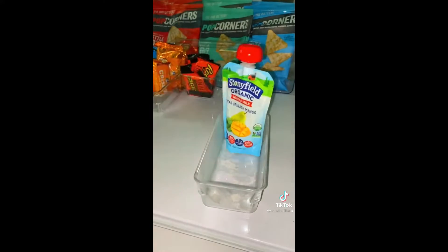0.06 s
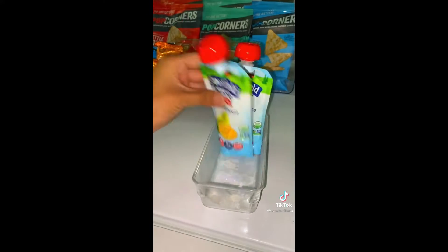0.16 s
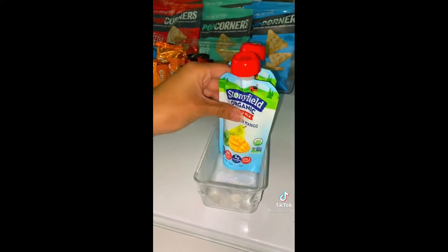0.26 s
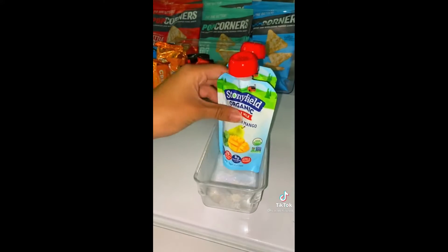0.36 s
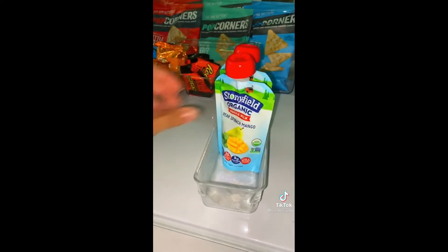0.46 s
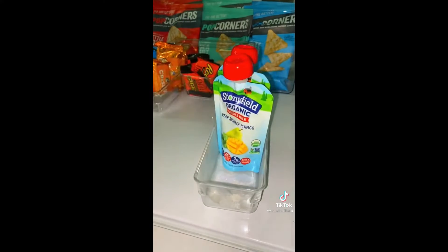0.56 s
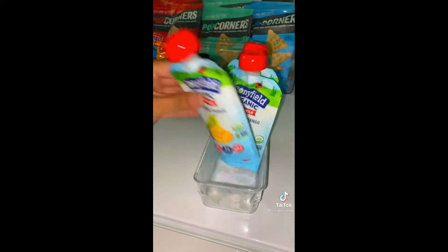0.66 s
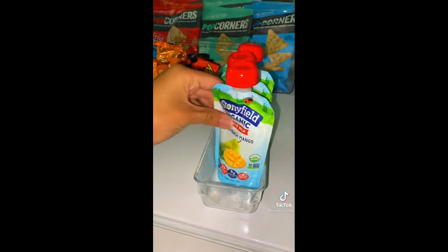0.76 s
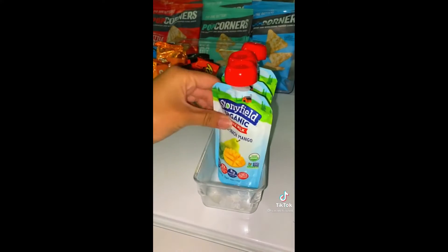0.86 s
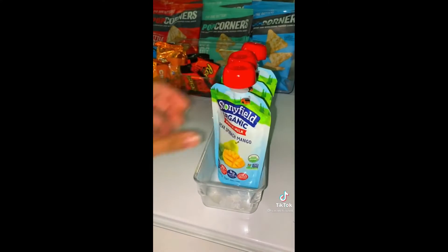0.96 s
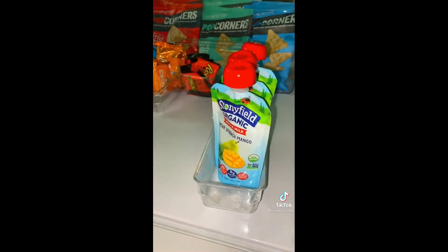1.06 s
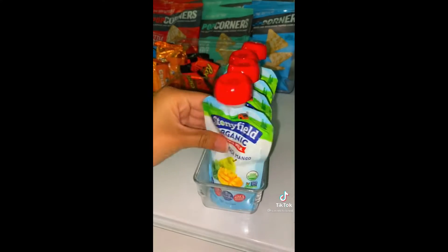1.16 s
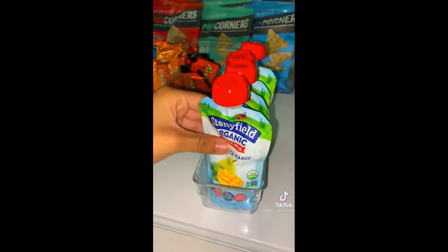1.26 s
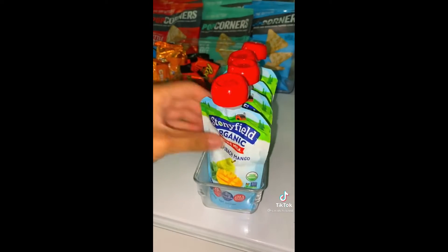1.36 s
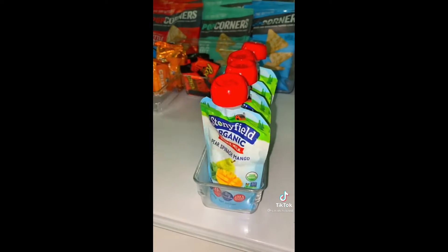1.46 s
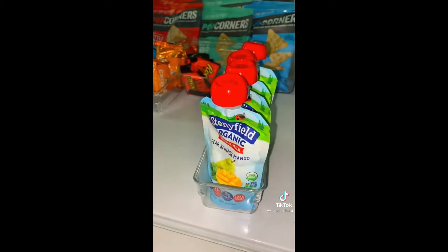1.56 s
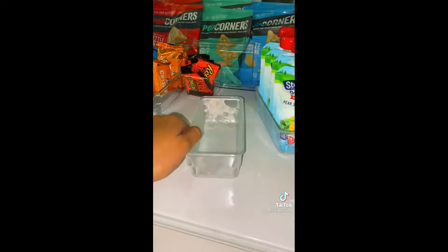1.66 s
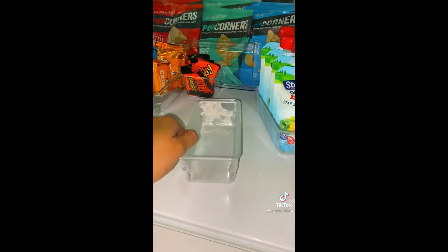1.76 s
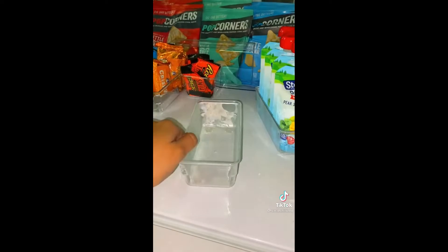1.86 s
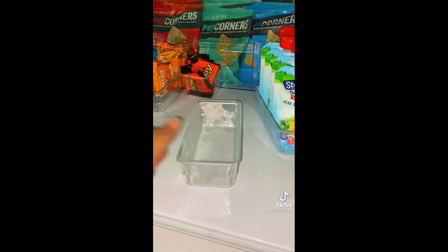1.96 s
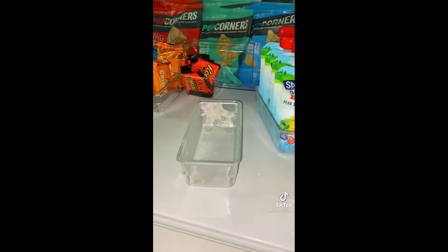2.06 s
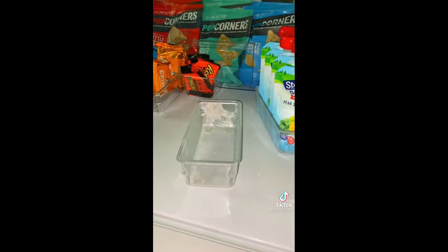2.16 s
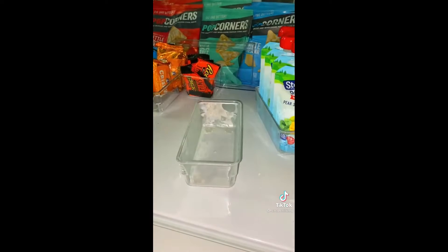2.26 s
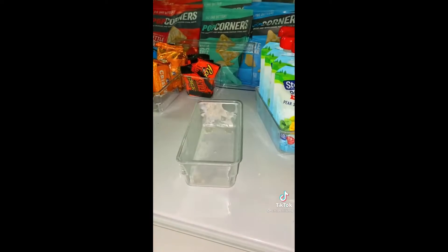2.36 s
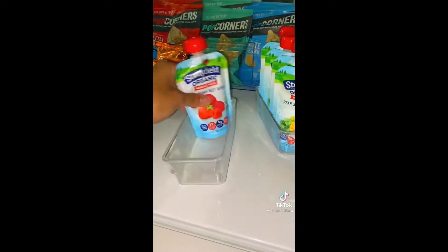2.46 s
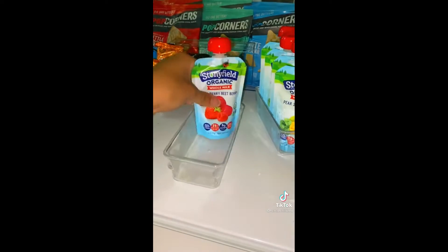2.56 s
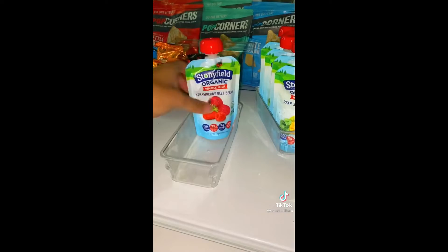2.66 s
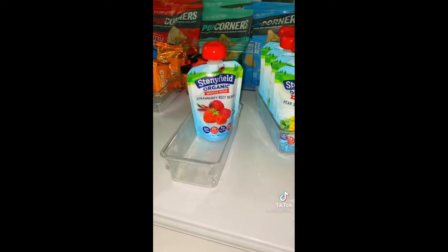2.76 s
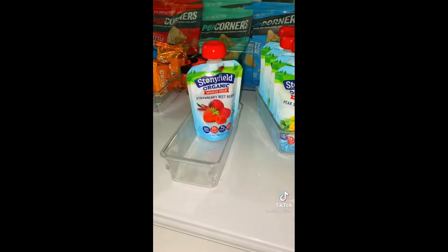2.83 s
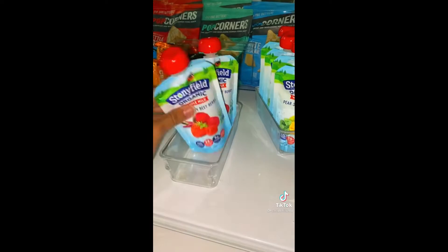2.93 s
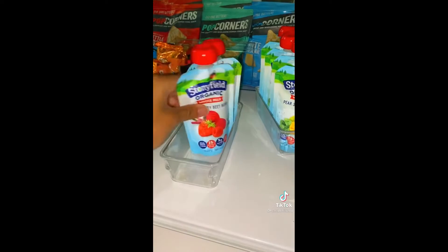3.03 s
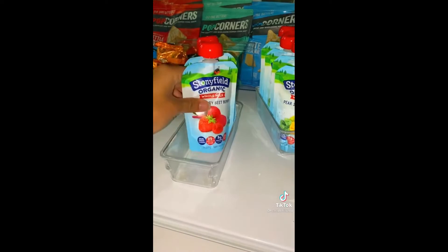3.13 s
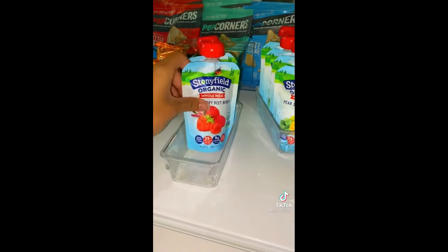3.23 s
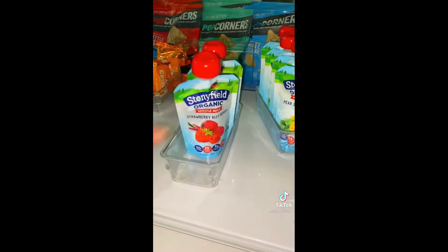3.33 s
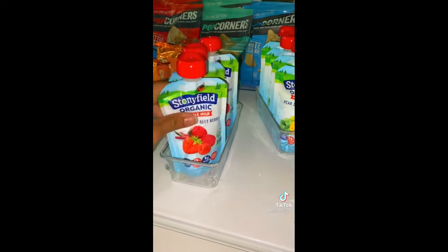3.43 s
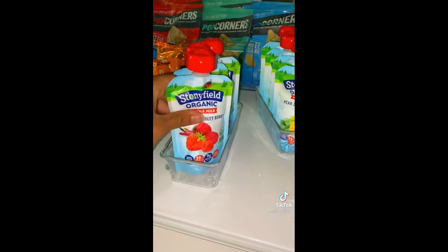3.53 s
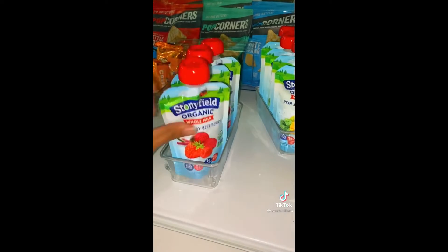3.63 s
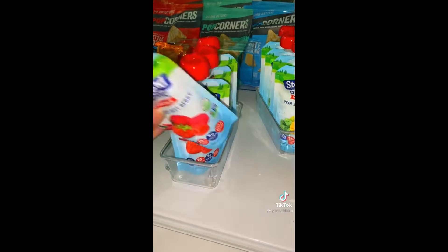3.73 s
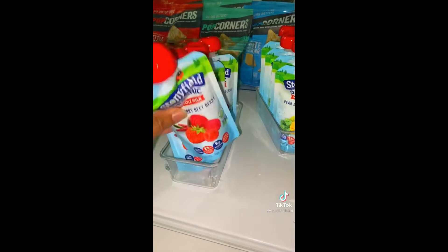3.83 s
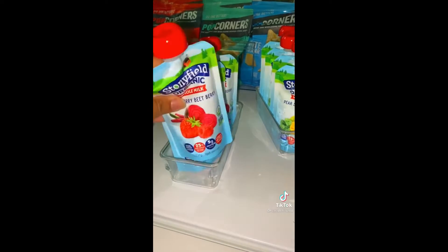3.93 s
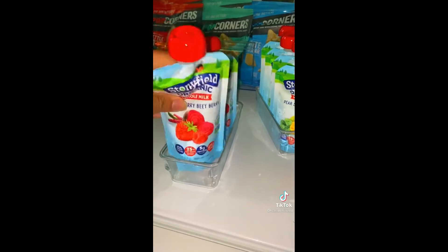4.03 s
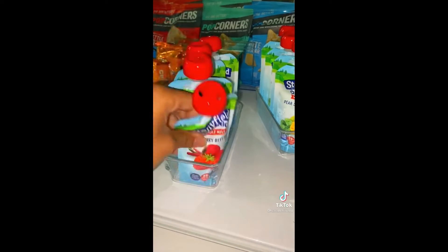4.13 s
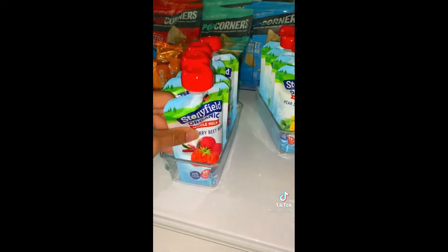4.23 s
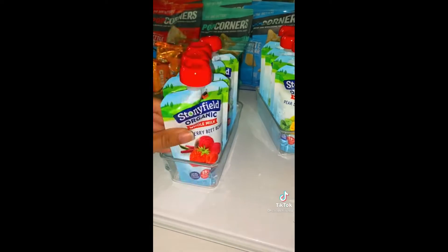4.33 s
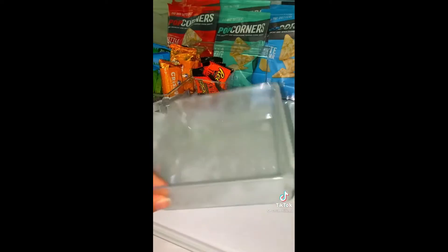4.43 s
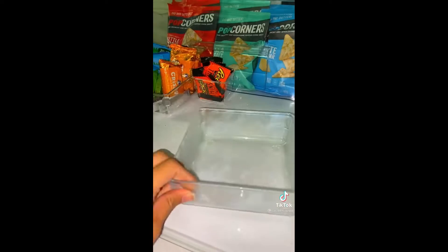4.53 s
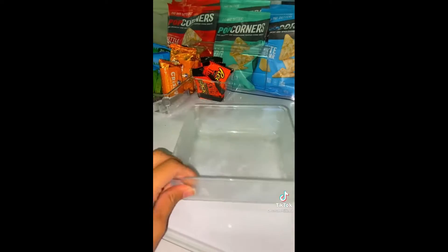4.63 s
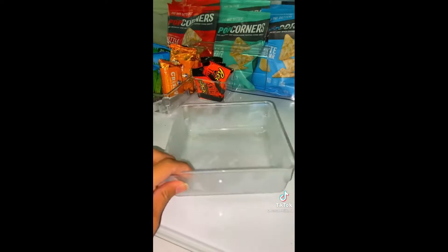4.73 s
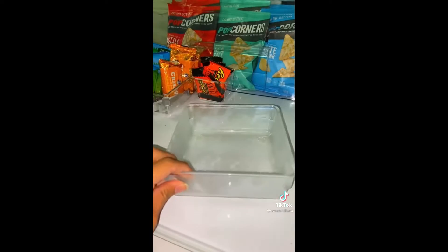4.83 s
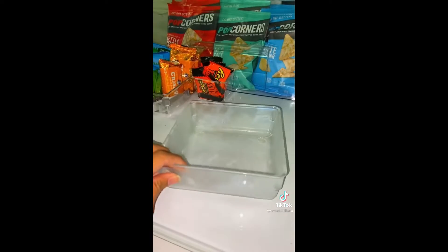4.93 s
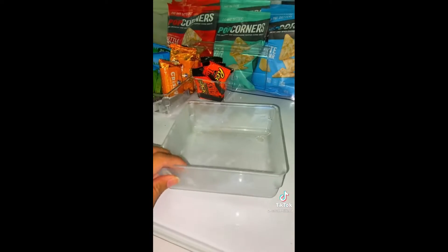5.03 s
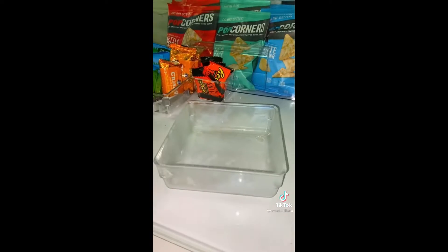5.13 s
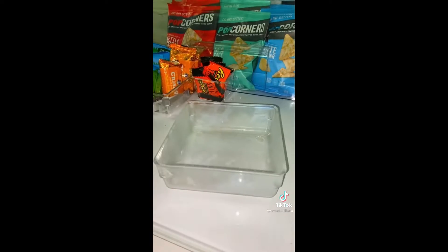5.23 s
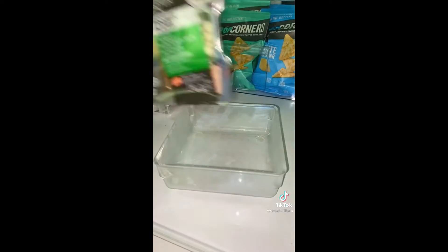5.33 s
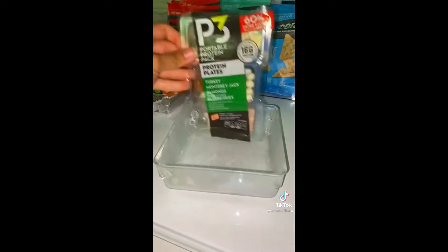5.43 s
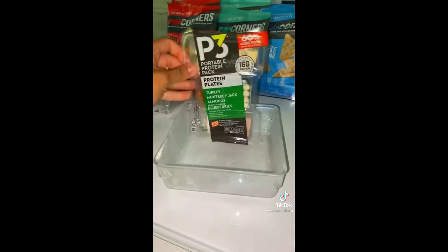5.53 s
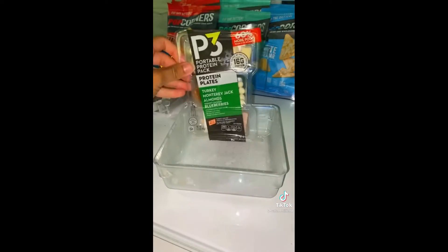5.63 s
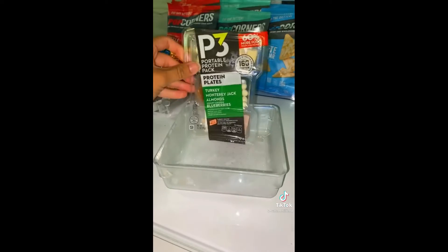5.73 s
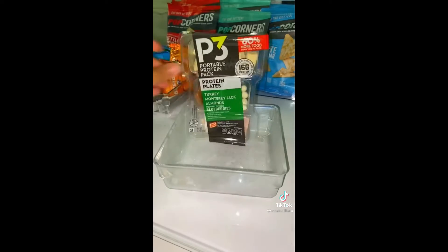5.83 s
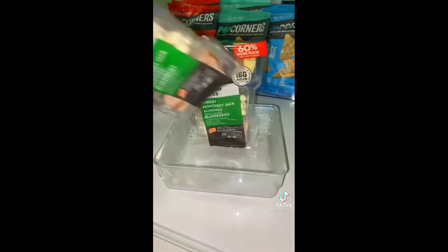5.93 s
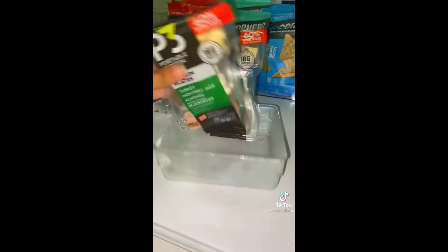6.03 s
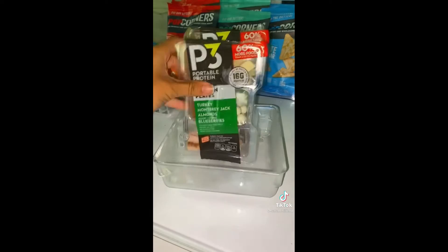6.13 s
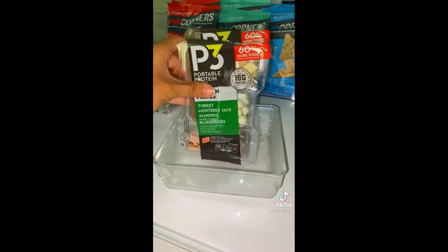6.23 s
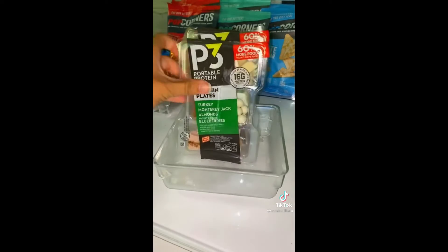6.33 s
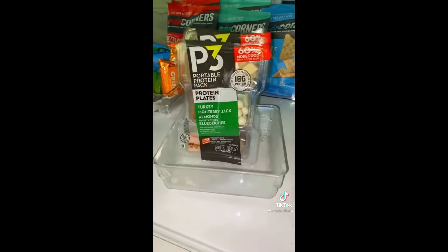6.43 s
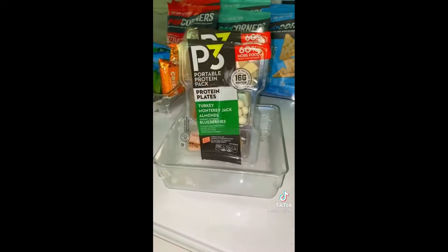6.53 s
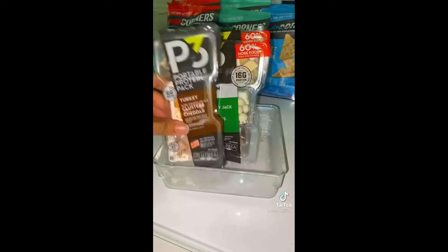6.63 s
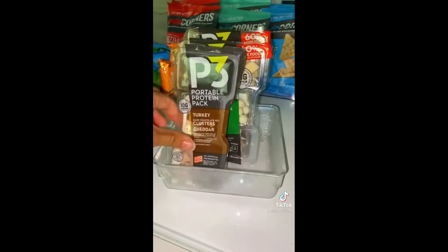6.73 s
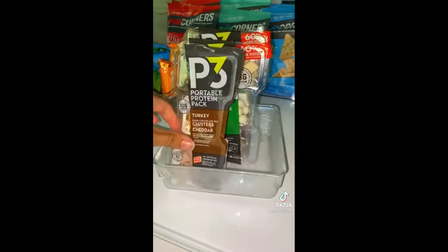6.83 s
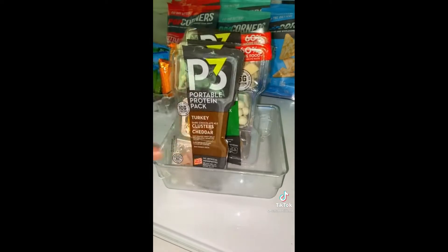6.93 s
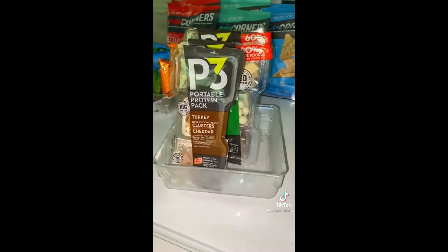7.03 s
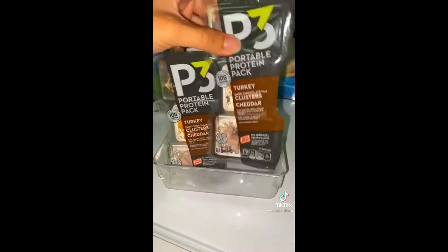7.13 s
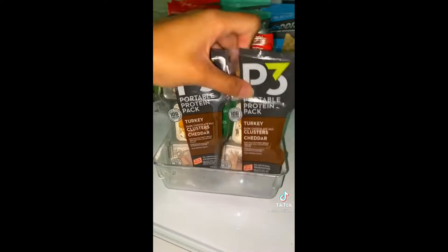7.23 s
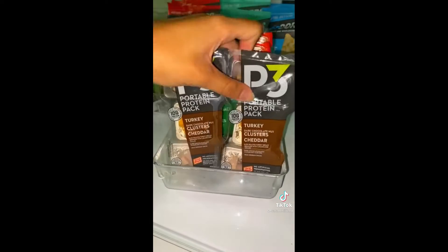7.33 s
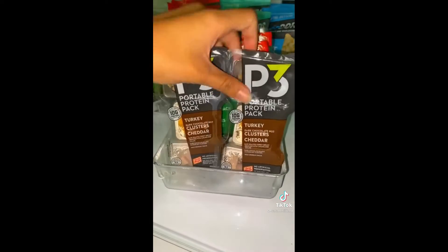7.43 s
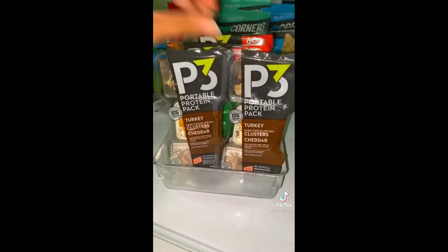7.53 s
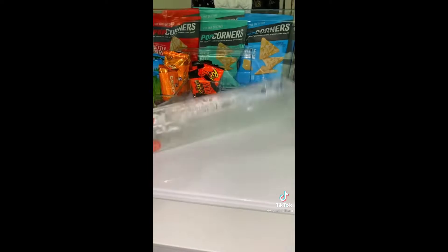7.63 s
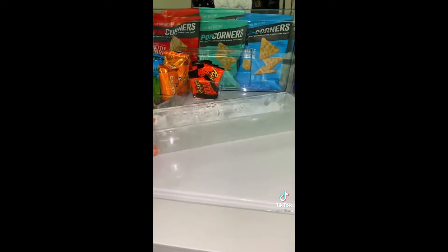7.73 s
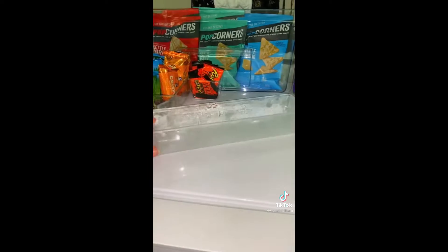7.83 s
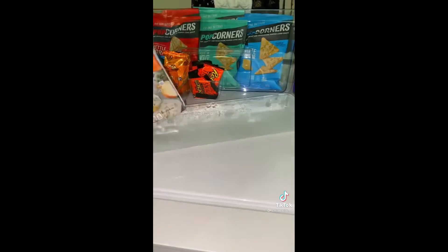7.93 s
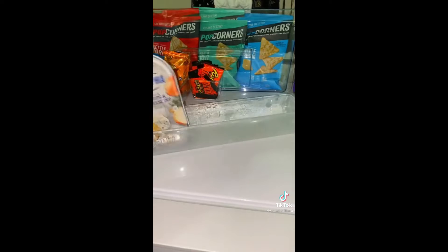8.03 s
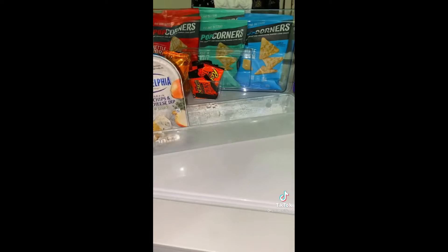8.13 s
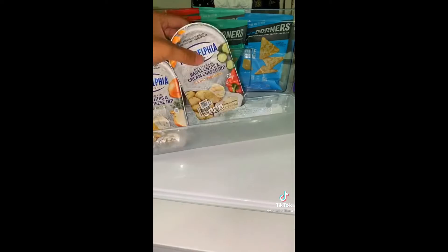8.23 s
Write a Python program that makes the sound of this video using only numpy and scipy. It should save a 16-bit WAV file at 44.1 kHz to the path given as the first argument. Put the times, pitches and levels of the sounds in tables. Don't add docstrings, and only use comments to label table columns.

```python
import sys
import numpy as np
from scipy import signal
from scipy.fft import rfft, irfft, next_fast_len
from scipy.io import wavfile
from scipy.ndimage import uniform_filter1d, map_coordinates

SR = 44100
rng = np.random.default_rng(int(sys.argv[2]) if len(sys.argv) > 2 else 0)


def voltage_ratio(decibels):
    exponent = np.asarray(decibels, float) / 20
    return 10 ** exponent


def file_out(sig):
    cols = np.atleast_2d(sig).T
    lim = np.clip(cols, -1, 1)
    pcm = np.round(lim * 32767).astype(np.int16)
    wavfile.write(sys.argv[1], SR, pcm)


N = 365148

# start_s, fade_in_s
SCENE_CHANGES = [(0.118, 0.043), (0.651, 0.0062), (1.101, 0.019), (1.67, 0.017), (2.404, 0.052),
                 (2.905, 0.019), (3.712, 0.042), (4.429, 0.044), (5.346, 0.032), (6.571, 0.026),
                 (7.127, 0.082), (7.646, 0.046), (7.912, 0.031), (8.251, 0.0069)]

# pitch_hz, level_db (rms)
COMPRESSOR_ORDERS = [(118.4, -59), (236.9, -58.5), (829.0, -68), (3908, -69.5), (4027, -70), (4145, -77),
                     (4619, -81), (6282, -91), (6638, -78), (11310, -84)]
# freq_hz, level_db (per Hz)
FAN_SPECTRUM = [(15, -63), (25, -47.5), (108, 1), (242, -3.5), (476, -5), (677, -12), (840, -15),
                (1230, -19.5), (3430, -28), (4030, -21), (5140, -38), (6380, -29), (8590, -37),
                (11300, -35.5), (16000, -89.5)]
# freq_hz, likeness (-1 to 1)
FAN_LIKENESS = [(60, 0.82), (240, 1), (950, 0.57), (3770, 0.16), (11000, 0.318), (13000, -1.1)]
# centre_s, level_db
AIR_PUFFS = [
    (1.63, -49),
    (3.68, -45),
    (7.1, -42.5),
]
# start_s, end_s, level_db, start_hz, end_hz
SLEEVE_BRUSHES = [
    (.84, .95, -65, 8200, 7750),
    (1.295, 1.561, -63, 7700, 8140),
    (1.562, 2.147, -72.5, 7700, 7300),
    (2.22, 2.416, -69, 7500, 8200),
    (2.25, 2.416, -66, 4580, 4940),
    (2.687, 2.75, -55, 9100, 9000),
    (3.816, 3.902, -50, 7940, 7950),
    (7.3, 7.396, -61, 8200, 8050),
    (4.635, 4.657, -59, 10800, 11000),
    (8.213, 8.25, -66, 8000, 7800),
]

# start_s, end_s, level_db
POUCH_RUBS = [(0, .101, -59), (.222, .268, -31), (.653, .771, -45.5), (.708, .862, -46),
              (1.039, 1.118, -65), (1.122, 1.149, -49), (1.908, 1.951, -58.5), (2.476, 2.553, -45),
              (3.046, 3.097, -46.5), (3.303, 3.386, -47), (3.409, 3.467, -38), (3.563, 3.703, -55.5),
              (3.808, 3.897, -45), (3.908, 4.044, -53), (4.063, 4.128, -48)]
# start_s, end_s, level_db
TRAY_RUBS = [(5.097, 5.12, -55), (5.349, 5.403, -47.5), (5.523, 5.638, -43.5), (5.653, 5.685, -55.5),
             (5.916, 5.94, -45), (5.997, 6.148, -41), (6.145, 6.219, -42.5), (6.301, 6.382, -55),
             (6.594, 6.656, -38.5), (6.666, 6.784, -43), (7.087, 7.133, -47), (7.163, 7.326, -46),
             (7.43, 7.552, -48.5), (7.66, 7.678, -47), (7.955, 8, -28.5), (8, 8.129, -45.5),
             (8.15, 8.196, -42)]
# start_s, end_s, level_db
FINGER_SLIDES = [(.161, .19, -50), (.516, .649, -64), (1.143, 1.186, -49.5), (1.341, 1.367, -50.5),
                 (2.287, 2.417, -70.5), (2.682, 2.749, -56.5), (2.798, 2.92, -62), (2.93, 2.951, -51.5),
                 (3.241, 3.305, -55.5), (3.458, 3.537, -58.5), (3.736, 3.795, -54), (4.113, 4.141, -36),
                 (4.216, 4.281, -72), (4.893, 4.903, -50.5), (5.964, 5.998, -46.5), (6.464, 6.59, -66),
                 (7.149, 7.163, -38), (7.402, 7.46, -65), (7.793, 7.92, -67)]
POUCH_HISS_DB, TRAY_HISS_DB, SLIDE_HISS_DB = -4, -6, 6
# freq_hz, level_db (per Hz)
FILM_HISS = [(2060, -31), (3500, -10.5), (5270, -7.5), (6700, -17), (7900, -9.5), (9440, -14.5),
             (12300, -12), (14500, -40)]
# pitch_hz, width_hz, level_db
BIN_RESONANCES = [(558, 31, 10.5), (756, 77, 7), (1369, 180, 6), (2050, 123, 9), (2500, 160, 2),
                  (3750, 1600, -1)]

# start_s, peak_db, ring_hz, brightness_db
FILM_TICKS = [(0.743, -9.5, 2260, -9.5), (0.8145, -18, 3420, 0), (1.184, -18, 2720, -2),
              (1.3363, -25, 4530, -13), (2.6562, -26.5, 1410, 3), (2.4528, -20.5, 2050, -6),
              (2.474, -32.5, 2120, -27), (3.3572, -33, 4600, 3), (3.4917, -32.5, 2230, -21),
              (3.53, -38, 5200, -10), (3.648, -33, 1400, -24), (3.8965, -29.5, 2120, -19),
              (4.2682, -36, 1400, -11), (4.5305, -29, 2400, -3), (4.995, -45, 4040, -8),
              (5.9703, -31.5, 1830, -13), (6.0736, -30, 2970, -16), (6.715, -22, 4900, -8),
              (6.761, -32, 4000, -6), (6.78, -38, 3480, -14), (7.2132, -11.5, 1280, -10.5),
              (0.2601, -24.5, 2110, 0), (7.815, -41.5, 4000, 5.5), (6.221, -34, 2500, -19.5),
              (5.985, -38, 2000, -22), (3.4627, -7, 4370, -3.5), (3.704, -26.5, 4550, -9.5),
              (3.742, -33.5, 5100, -21), (4.123, -6.5, 2350, -26.5), (4.325, -25, 2250, -20),
              (5.618, -23.5, 4410, -16), (5.731, -33, 4460, -13), (5.896, -32, 4640, -10),
              (5.936, -16.5, 1840, -13), (6.082, -28, 1460, -35), (6.1764, -16.5, 1520, -28),
              (6.231, -27.5, 1750, -20), (6.3336, -33, 1930, -13.5), (6.7027, -17, 3850, -25),
              (7.0387, -40.5, 3830, -3), (7.122, -22.5, 3880, -1), (7.1734, -10, 4400, -13),
              (7.261, -22, 3190, -3), (7.287, -18, 2850, -6.5), (7.302, -32, 4100, -15),
              (7.3898, -15, 1730, -25), (7.4047, -14.5, 1650, -15.5), (7.891, -31.5, 2960, -1.5),
              (8.0442, -14, 2500, -16.5)]
# start_s, peak_db, ring_hz, brightness_db
CREASES = [(0.054, -29, 4340, 11.5), (2.4597, -21, 2050, -7), (3.409, -28.5, 1400, -6.5),
           (6.7204, -16.5, 3600, -16.5), (6.1375, -14, 3660, -15), (6.132, -28, 1850, -26),
           (6.5984, -28, 1810, -14), (7.1005, -29, 1510, -10), (7.316, -36, 3540, -17.5),
           (4.1002, -28, 2200, -4.5), (3.938, -29.5, 1920, -19), (1.064, -47, 3300, -16),
           (1.742, -47.5, 5740, 3), (1.918, -51, 2050, -6), (.7185, -40, 2100, 7),
           (6.631, -26.5, 2000, -15), (7.832, -46.5, 3900, -10), (3.3144, -25, 2120, -20.5),
           (6.0336, -26.5, 1450, -7.5), (2.5395, -29.5, 4470, -10.5), (0.2214, -5.5, 2040, -17.5),
           (.254, -17.5, 2100, -13), (0.3325, -27, 2560, -30), (0.844, -34, 6450, 15),
           (1.2295, -31, 2000, -20.5), (2.6668, -30.5, 1330, -15), (2.839, -28.5, 2400, -14.5),
           (2.9625, -11, 2500, -16.5), (3.0502, -23.5, 5100, 6), (3.065, -26, 2530, -24.5),
           (3.346, -28, 2410, -11.5), (3.4363, -12.5, 1540, -22), (3.572, -32, 1730, -13),
           (3.6315, -37, 2050, -16), (3.6795, -22, 2720, -4), (3.794, -27, 5100, -11.5),
           (3.8148, -14, 2000, -21), (3.807, -27, 2000, -12), (3.9247, -25.5, 4950, -4),
           (4.203, -34, 1560, -15.5), (5.5253, -13, 4600, -16), (5.9943, -15, 1390, -20.5),
           (6.1467, -6.5, 2980, -19), (6.186, -23, 1300, -37), (6.2016, -24.5, 1710, -20),
           (6.565, -35.5, 1640, -16), (6.615, -12.5, 2040, -18), (6.8298, -29.5, 2190, -16.5),
           (7.1901, -19, 1620, -15.5), (7.445, -6.5, 3800, -16)]
# start_s, peak_db, ring_hz
CRUNCHES = [(.161, -31, 2260), (0.4105, -38, 2100), (0.755, -17.5, 2020), (0.7908, -34, 2060),
            (1.1527, -12, 2050), (1.766, -25, 1460), (2.5016, -25, 2400), (2.535, -37.5, 2270),
            (3.3637, -29.5, 2380), (3.831, -28, 2180), (3.872, -34.5, 2100), (4.022, -28.5, 2286),
            (4.079, -35.5, 1620), (4.1091, -5.5, 2090), (4.5496, -22.5, 3090), (5.555, -17.5, 1860),
            (6.044, -29.5, 1490), (6.591, -39.5, 1800), (7.224, -14.5, 1680), (7.6766, -11.5, 2990),
            (7.947, -14.5, 2320), (7.96, -17, 2320), (8.017, -17.5, 2250), (8.0429, -15, 2490),
            (8.154, -28.5, 2940)]
# start_s, peak_db
SPECKS = [(0.0194, -48), (0.093, -43), (0.663, -34), (.703, -34.5), (1.27, -50.5), (1.4, -42),
          (2.7945, -44), (2.9307, -40), (3.304, -39), (3.5155, -42.5), (3.6152, -38), (3.7259, -34),
          (3.752, -31), (4.0676, -42), (4.239, -41.5), (5.654, -38.5), (5.9265, -28.5), (6.2984, -44),
          (6.497, -44), (6.966, -44), (7.1516, -33), (7.222, -25), (7.273, -31), (7.925, -39),
          (8.196, -33.5), (8.268, -43), (6.736, -35.5), (4.638, -46), (6.092, -36.5), (6.103, -42),
          (6.161, -24), (0.5224, -45.5), (0.595, -35.5), (2.5642, -43.5), (2.6286, -37), (2.876, -42),
          (3.0898, -41), (3.1771, -41), (4, -35.5), (5.096, -40.5)]
# freq_hz, level_db (per Hz)
FOIL_SPECTRUM = [(290, -13), (500, -14), (938, -9.5), (2540, -3.5), (5270, -6.5), (6470, -13),
                 (8300, -12.5), (11600, -13.5), (16500, -24.5)]
TICK_S, CREASE_S, CRUNCH_S = 0.0015, 0.0031, 0.0068
CRUNCH_BRIGHT_DB, BRIGHT_PER_DB = 2, 1.38
SPECK_HZ, SPECK_BRIGHT_DB = 2500, -10.5
SCUFF_LEAD_S, SCUFF_DB, SCUFF_HZ, SCUFF_BRIGHT_DB = 0.00066, -37, 1680, -15.5
SNAP_RING_DB = -15

# start_s, peak_db, upper_modes_db, contact_s, ring_share
PACK_LANDINGS = [(.2232, -13, -5, .004, .55), (.7438, -17, -8, 0.0018, 0.6), (.7621, -24, -5, 0.0033, 0.89),
                 (1.154, -19, 0, 0.0031, 0.91), (2.4763, -21.5, -10, 0.0027, 1.05),
                 (2.6303, -25, -7.5, 0.0043, 0.8), (2.9631, -15.5, 0.5, 0.0035, 0.66),
                 (3.0533, -21, -12, 0.0045, 1.26), (4.1289, -20, -1.5, 0.00063, .6),
                 (5.524, -15.5, -14.5, 0.0019, 0.68), (5.552, -20.5, -1.5, .0042, 1.06),
                 (6.1455, -6, -0.5, 0.0036, .55), (6.153, -18, -1.5, 0.0031, .6),
                 (6.6003, -22, -21, 0.0077, 0.81), (7.679, -4, 2, 0.00315, 0.56),
                 (7.6845, -9.5, -0.5, 0.0032, 1.06), (7.697, -14.5, -14, 0.0054, 0.73),
                 (7.948, -18.5, -6, 0.0062, 1.6), (7.965, -15, -10, .003, .7),
                 (8.0202, -10, -13.5, 0.0063, 0.71), (8.0424, -20, 3, 0.0035, 1.44)]
# start_s, peak_db, upper_modes_db, contact_s, ring_share
BIN_LANDINGS = [
    (1.7679, -12.5, 1.5, 0.003, 0.6),
    (1.839, -21.5, 1, 0.0015, 0.74),
    (4.522, -14.5, -12, 0.005, 1.2),
    (4.5282, -4, -3.5, 0.0023, 0.89),
    (4.5504, -17, 0, 0.0043, 0.71),
    (4.563, -30, 0, 0.0024, 0.75),
    (4.68, -16.5, -3.5, 0.0051, 1.1),
    (4.724, -13, -5, 0.0026, 0.46),
    (4.963, -13, -5.5, 0.0018, 0.93),
    (5.062, -18.5, 0.5, 0.0033, 0.72),
]
# start_s, peak_db
SOFT_TAPS = [(0.021, -32), (0.166, -32.5), (.6805, -32), (.7942, -36), (1.675, -25.5), (1.784, -23),
             (1.823, -37), (2.508, -27.5), (2.5336, -29), (2.464, -31.5), (2.488, -28.5), (2.676, -38.5),
             (3.346, -31), (3.744, -39.5), (.817, -33), (6.746, -37), (.178, -36), (3.316, -23),
             (3.413, -33), (3.4379, -24.5), (3.465, -26), (3.5143, -35), (3.575, -39), (3.6484, -32.5),
             (3.681, -31), (3.8091, -26.5), (3.8305, -30), (4.0017, -34.5), (4.8021, -30), (4.898, -33),
             (6.6798, -27), (6.7025, -24), (7.66, -26), (8.062, -28)]
# start_s, peak_db
EDGE_TAPS = [
    (4.017, -33),
    (5.923, -34),
    (5.9952, -33),
    (6.0409, -31.5),
    (6.7746, -36),
    (7.1002, -36.5),
    (7.2655, -35.5),
    (7.4424, -32),
]
# pitch_hz, level_db, t60_share
SHELF_LOW_MODES = [(312, -17, 0.49), (418, -18, .7), (551.6, 3, 0.98), (582, -17.5, 0.19)]
# pitch_hz, level_db, t60_share
SHELF_HIGH_MODES = [(740.5, 0, 0.65), (849, -10, 0.79), (1003, -8.5, 0.79), (1114, -18.5, 1),
                    (1400, -20, 0.8), (1955, -26, 1), (2400, -29.5, 0.4)]
SHELF_T60_S = 0.062
RING_PER_DB = 0.0648
SOFT_UPPER_DB, SOFT_CONTACT_S, SOFT_RING_SHARE = -9, 0.003, 0.7
EDGE_UPPER_DB, EDGE_CONTACT_S, EDGE_RING_SHARE = 1.5, 0.0031, 0.9

# freq_hz, t60_s
CABINET_DECAY = [(300, 0.13), (2000, 0.1), (5000, 0.11), (10000, 0.063)]
# freq_hz, phase_rad
PORT_PHASE = [(700, 0), (1100, -.4), (1600, 0), (4000, 0), (6500, .6), (11400, .6), (12600, 2.7),
              (14000, 3.1)]
# freq_hz, left_over_right_db
PORT_BALANCE = [(300, 1.7), (1300, -4.5), (2500, 0), (5000, -3), (14000, 0.3)]


def unit(x):
    return x / np.sqrt(np.mean(x ** 2, axis=-1, keepdims=True) + 1e-20)


def along(points, hz):
    freq, value = np.transpose(points)
    return np.interp(np.log(hz + 1), np.log(freq + 1), value)


def wobble(rate):
    knots = rng.standard_normal(int(N * rate / SR) + 4)
    return map_coordinates(knots, [np.arange(N) * rate / SR])


def filtered(x, response):
    size = next_fast_len(x.shape[-1] + 2048)
    spectrum = rfft(x, size) * response(np.fft.rfftfreq(size, 1 / SR))
    return irfft(spectrum, size)[..., :x.shape[-1]]


def placed(times, rows):
    at = np.round(times * SR).astype(int)[:, None] + np.arange(rows.shape[1])
    return np.bincount(at.ravel(), rows.ravel(), N + rows.shape[1])[:N]


def patchy(x, depth_db):
    z = signal.stft(x, nperseg=256)[2]
    field = rng.standard_normal(z.shape[-2:])
    field = uniform_filter1d(field, size=7, axis=0)
    field = uniform_filter1d(field, size=7, axis=1)
    gain = voltage_ratio(depth_db * field / field.std())
    return signal.istft(z * gain, nperseg=256)[1][..., :N]


def fridge():
    drift = np.arange(N) / SR + 2e-5 * wobble(4.4)
    phase = rng.random(len(COMPRESSOR_ORDERS))
    sway_db = 0.8 * wobble(5)
    hum = np.zeros(N)
    for (hz, db), turn in zip(COMPRESSOR_ORDERS, phase):
        hum += voltage_ratio(db + 3.5 + sway_db) * np.sin(2 * np.pi * (hz * drift + turn))

    def mid_side(hz):
        angle = np.arccos(np.clip(along(FAN_LIKENESS, hz), -1, 1)) / 2
        return voltage_ratio(along(FAN_SPECTRUM, hz)) * [np.cos(angle), np.sin(angle)]

    mid, side = filtered(rng.standard_normal((2, N)), mid_side)
    fan = unit(patchy(np.array([mid + side, mid - side]), depth_db=3.5))
    return voltage_ratio(-49.5 + sway_db) * fan + hum * voltage_ratio([[-0.6], [0.6]])


def puffs():
    t = np.arange(N) / SR
    swell = sum(voltage_ratio(db) * np.exp(-((t - start) / 0.051) ** 2) for start, db in AIR_PUFFS)
    rumble = filtered(rng.standard_normal(N), lambda hz: hz ** 2.0 / (1 + (hz / 115) ** 5))
    return swell * unit(rumble)


def brushes():
    out = np.zeros(N)
    for start, end, db, from_hz, to_hz in SLEEVE_BRUSHES:
        a, b = round(start * SR), round(end * SR)
        u = np.linspace(0, 1, b - a)
        phase = 2 * np.pi * np.cumsum(from_hz + (to_hz - from_hz) * u) / SR
        width_hz = 0.11 * from_hz
        flutter = uniform_filter1d(rng.standard_normal(SR)[:b - a], round(SR / width_hz))
        swell = np.sqrt(np.sin(np.pi * u).clip(0))
        out[a:b] += voltage_ratio(db) * swell * unit(flutter) * np.sin(phase)
    return out


def bin_ring(hz):
    total = 0
    for k, (centre, width, db) in enumerate(BIN_RESONANCES):
        damping = 1j * hz * width
        total = total + (-1) ** k * voltage_ratio(db) * damping / (centre * centre - hz * hz + damping)
    return total


def film_hiss(hz):
    return voltage_ratio(along(FILM_HISS, hz))


def crackle(rate, spread_db, floor):
    draw = rng.random((2, N))
    sign = np.sign(draw[0] * 1e6 % 2 - 1)
    size = voltage_ratio(-spread_db * np.log(np.maximum(draw[1], 0.04))) * sign
    slips = (draw[0] < rate / SR * voltage_ratio(5.5 * wobble(35))) * size
    return unit(slips) + floor * rng.standard_normal(N) * voltage_ratio(0.57 * wobble(33))


def rubbing():
    kinds = [(POUCH_RUBS, POUCH_HISS_DB), (TRAY_RUBS, TRAY_HISS_DB), (FINGER_SLIDES, SLIDE_HISS_DB)]
    return sorted((a, b, db, db + hiss_db) for rows, hiss_db in kinds for a, b, db in rows)


def strokes(levels_db, sag_db):
    pressure = voltage_ratio(np.min(levels_db) - 5.0 + 4.6 * wobble(4.2))
    for (start, end, *_), db in zip(rubbing(), levels_db):
        a, b = round(start * SR), round(end * SR)
        pressure[a:b] = voltage_ratio(db + np.linspace(sag_db, -sag_db, len(pressure[a:b])))
    release = np.exp(-np.arange(SR // 20) / SR / 0.0048)
    released = signal.fftconvolve(pressure, release / release.sum())[:N]
    return np.maximum(uniform_filter1d(pressure, size=130), released)


def rustle():
    body_db, hiss_db = np.transpose(rubbing())[2:]
    slips = crackle(rate=450, spread_db=4, floor=0.6)
    film = slips + 0.8 * crackle(rate=700, spread_db=4, floor=0.8)

    def mean_gain(response):
        return np.sqrt(np.mean(np.abs(response(np.linspace(1, SR / 2, num=2000))) ** 2))

    body = filtered(slips * strokes(body_db - 0.5, sag_db=3.5), bin_ring) / mean_gain(bin_ring)
    hiss = filtered(film * strokes(hiss_db - 6.5, sag_db=2.0), film_hiss) / mean_gain(film_hiss)
    return patchy(body + hiss, depth_db=3)


def folds():
    ticks = [(*row, TICK_S) for row in FILM_TICKS]
    creases = [(*row, CREASE_S) for row in CREASES]
    crunches = [(s, db, hz, CRUNCH_BRIGHT_DB + BRIGHT_PER_DB * db, CRUNCH_S)
                for s, db, hz in CRUNCHES]
    scuffs = [(s - SCUFF_LEAD_S, SCUFF_DB, SCUFF_HZ, SCUFF_BRIGHT_DB, CREASE_S) for s, *_ in BIN_LANDINGS]
    specks = [(s, db, SPECK_HZ, SPECK_BRIGHT_DB, TICK_S) for s, db in SPECKS]
    return ticks + creases + crunches + scuffs + specks


def snaps():
    start, peak_db, ring_hz, bright_db, length = np.transpose(folds())[..., None]
    u = np.arange(1024) / SR / (0.49 * np.clip(length, 0.0005, 0.02))
    noise = rng.standard_normal((len(start), 2, u.shape[1]))
    spiky = noise[:, 0] * voltage_ratio(2.03 * noise[:, 1])
    burst = spiky * u * np.exp(1 - u)
    width = ring_hz / 7

    def pack(hz):
        octaves = np.clip(np.log2(hz / 2500 + 1e-9) / 1.54, -0.3, 1.1)
        tilt = voltage_ratio(along(FOIL_SPECTRUM, hz) + (bright_db + 13.0) * octaves)
        damping = 1j * hz * width
        patch = 0.47 + damping / (ring_hz ** 2 - hz ** 2 + damping)
        return tilt * patch

    rows = filtered(burst, pack)
    rows = rows * voltage_ratio(peak_db + 4.0) / np.abs(rows).max(axis=1, keepdims=True)
    sound = placed(start[:, 0] - 0.0005, rows)
    return filtered(sound, lambda hz: 1 + voltage_ratio(SNAP_RING_DB) * bin_ring(hz))


def blows():
    soft = [(*tap, SOFT_UPPER_DB, SOFT_CONTACT_S, SOFT_RING_SHARE) for tap in SOFT_TAPS]
    edge = [(*tap, EDGE_UPPER_DB, EDGE_CONTACT_S, EDGE_RING_SHARE) for tap in EDGE_TAPS]
    return [*PACK_LANDINGS, *BIN_LANDINGS, *soft, *edge]


def knocks():
    start, peak_db, upper_db, contact, ring_share = np.transpose(blows())[..., None]
    t = np.arange(SR // 14) / SR
    modes = [(hz, level + 0 * peak_db, share) for hz, level, share in SHELF_LOW_MODES]
    modes += [(hz, level + upper_db, share) for hz, level, share in SHELF_HIGH_MODES]
    chance = rng.standard_normal((len(start), len(modes), 3)) * [1.8, 0.015, 0.5]
    after = np.maximum(t - contact, 0)
    blow_t60 = SHELF_T60_S * ring_share * voltage_ratio(RING_PER_DB * peak_db)
    ring = 0
    for k, (hz, level, share) in enumerate(modes):
        level_db = level + chance[:, k, :1] - 60 * after / (blow_t60 * share)
        pitch = hz * (1 + chance[:, k, 1:2])
        ring = ring + voltage_ratio(level_db) * np.sin(2 * np.pi * pitch * (t - contact) + chance[:, k, 2:])
    build_up = np.clip(t / (contact + 0.0015), 0, 1) ** 1.17
    return placed(start[:, 0] - 0.001, voltage_ratio(peak_db + 0.1) * ring * build_up)


def cabinet(x):
    out, step = np.zeros((2, N + SR)), SR // 6
    for start in range(0, N, step):
        hz, t, z = signal.stft(rng.standard_normal((2, step)), SR, nperseg=128)
        z[1] *= (hz / (hz + 2500))[:, None]
        decay = voltage_ratio(-60 * t / along(CABINET_DECAY, hz)[:, None])
        mid, side = signal.istft(z * decay, SR, nperseg=128)[1]
        tail = np.array([mid + side, mid - side]) / np.linalg.norm(mid)
        wet = signal.fftconvolve(x[None, start:start + step], tail, axes=1)
        out[:, start:start + wet.shape[1]] += wet
    return out[:, :N]


def ports(x):
    half = np.array([[0.5], [-0.5]])

    def response(hz):
        return voltage_ratio(half * along(PORT_BALANCE, hz)) * np.exp(1j * half * along(PORT_PHASE, hz))

    return filtered(x, response)


def scene():
    background = fridge() + puffs()
    bright = brushes() + rustle() + snaps()
    boom = knocks()
    wet = cabinet(voltage_ratio(-10) * boom + voltage_ratio(-12) * bright)
    heard = ports(boom + bright + wet)
    handling = filtered(heard, lambda hz: (1j * hz / (170 + 1j * hz)) ** 2)
    return handling + background


def top_cut(x):
    return signal.sosfilt(signal.butter(12, 16970, fs=SR, output="sos"), x)


def record(dry):
    t, gain = np.arange(N) / SR, np.ones(N)
    for start, fade in SCENE_CHANGES:
        fade_in = np.clip(0.1 + (t - start) / fade, 0, 1) ** 1.3
        gain = gain * np.where(t < start, 1, fade_in)
    mix = dry * gain
    mix = mix / (1 + np.abs(mix / 0.97) ** 16) ** (1 / 16)
    return top_cut(mix)


dry = scene()
out = record(dry)
file_out(out)
```